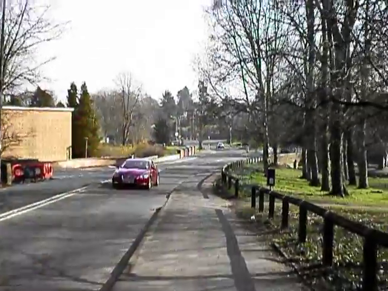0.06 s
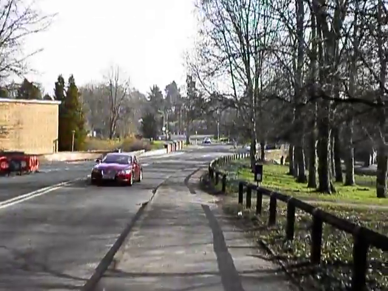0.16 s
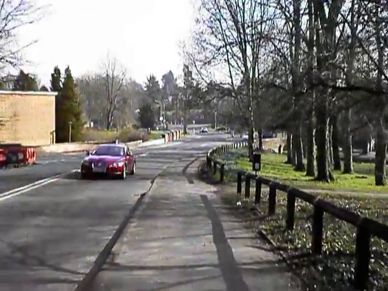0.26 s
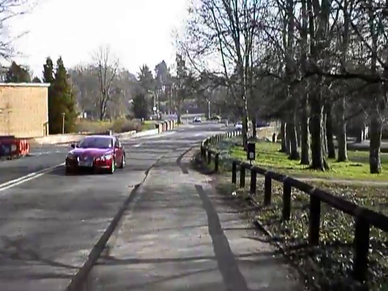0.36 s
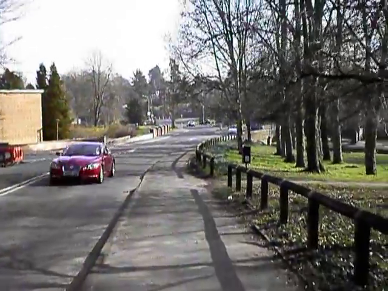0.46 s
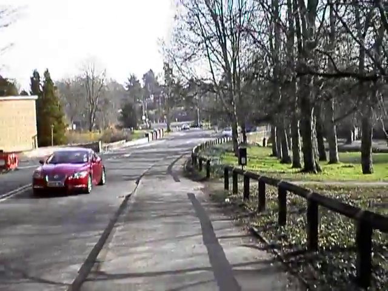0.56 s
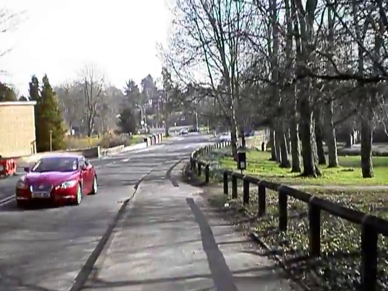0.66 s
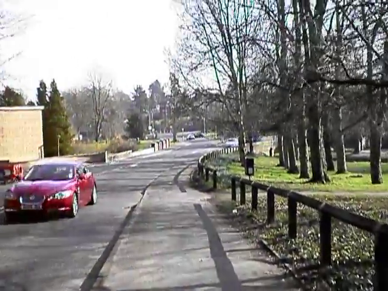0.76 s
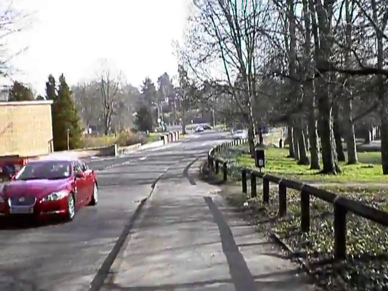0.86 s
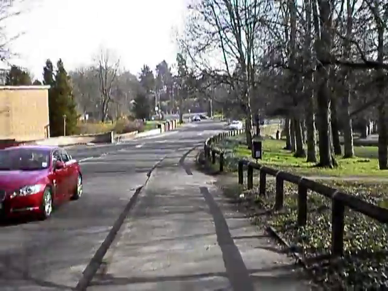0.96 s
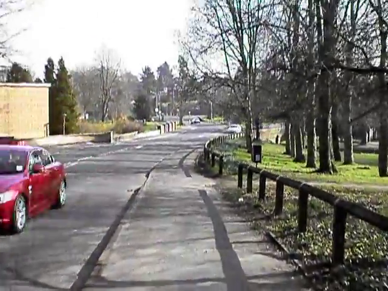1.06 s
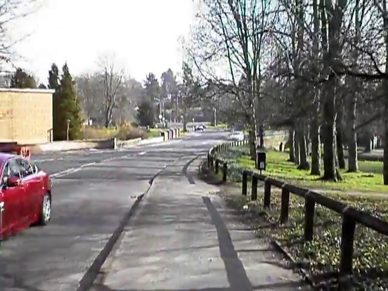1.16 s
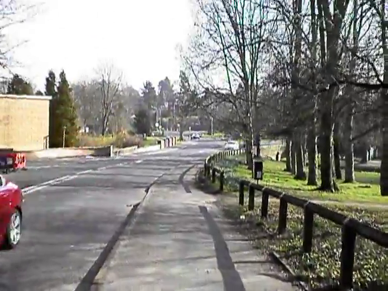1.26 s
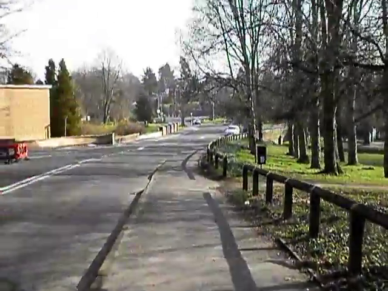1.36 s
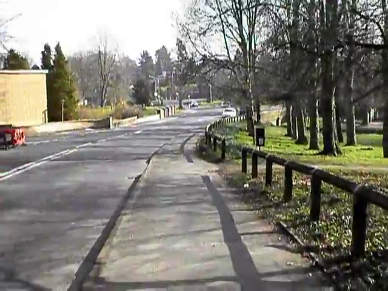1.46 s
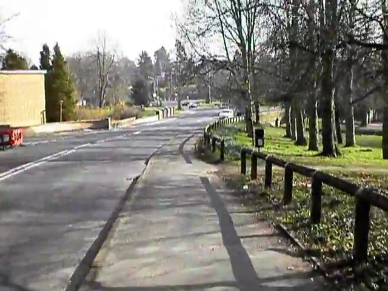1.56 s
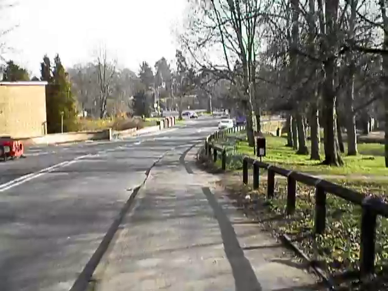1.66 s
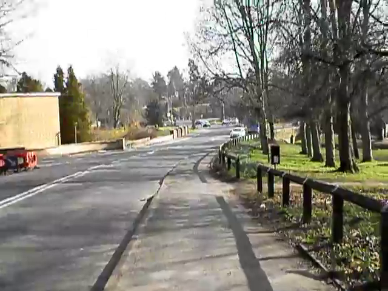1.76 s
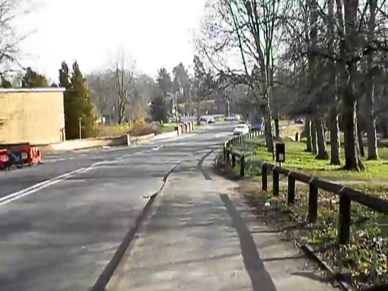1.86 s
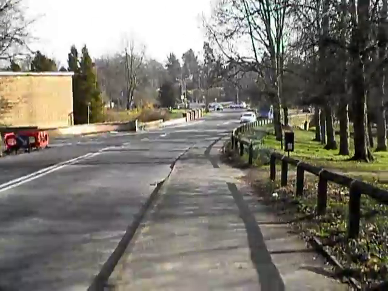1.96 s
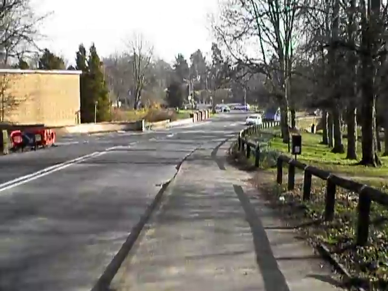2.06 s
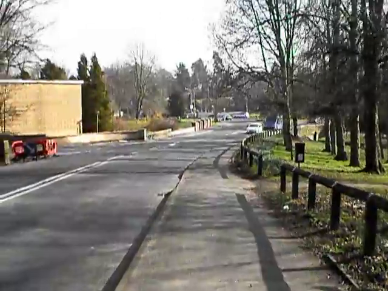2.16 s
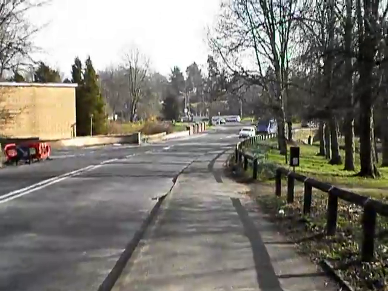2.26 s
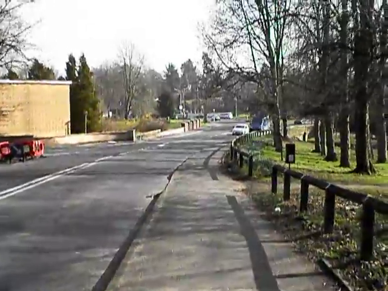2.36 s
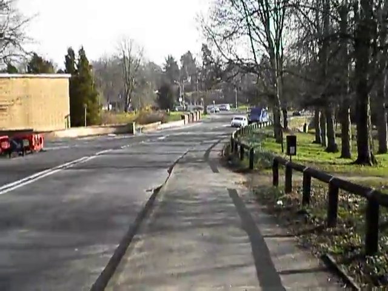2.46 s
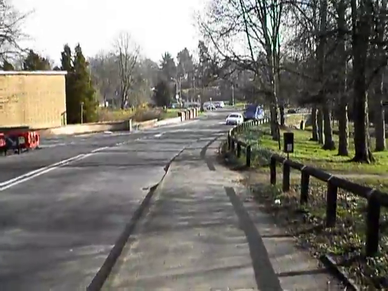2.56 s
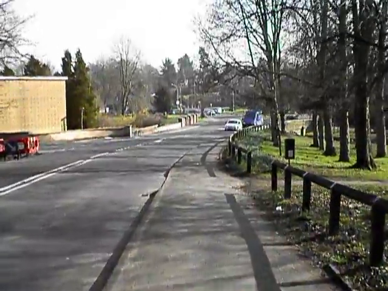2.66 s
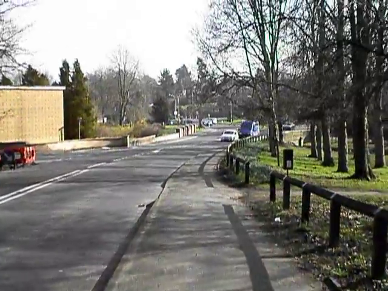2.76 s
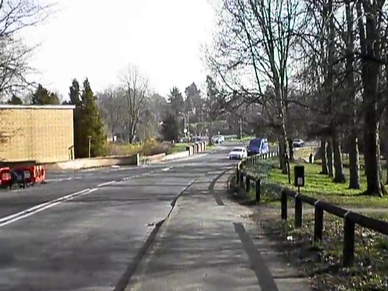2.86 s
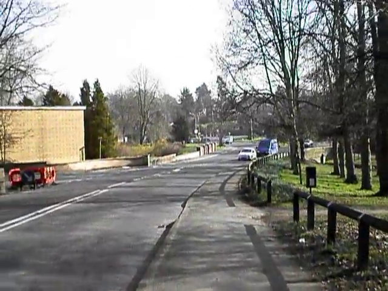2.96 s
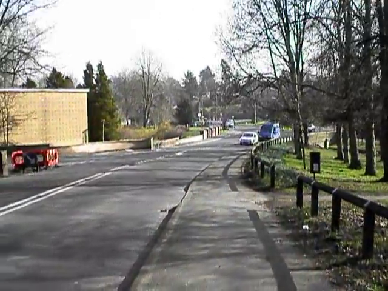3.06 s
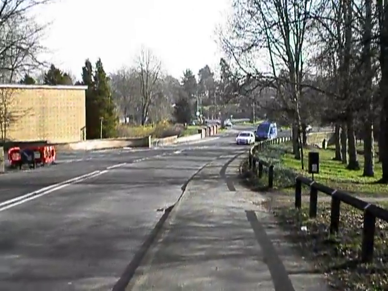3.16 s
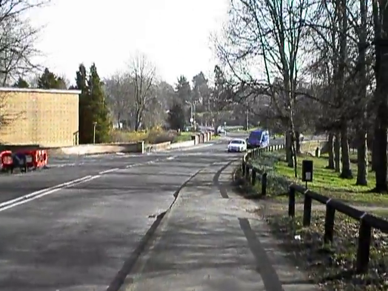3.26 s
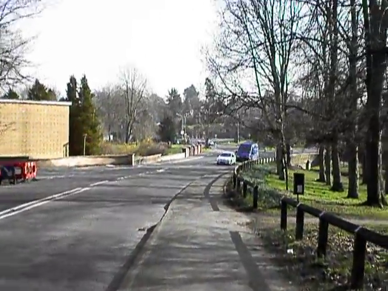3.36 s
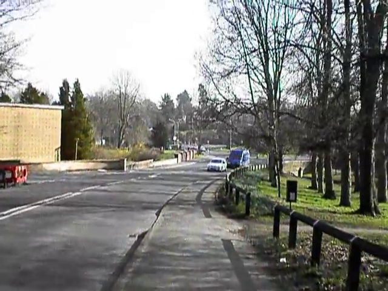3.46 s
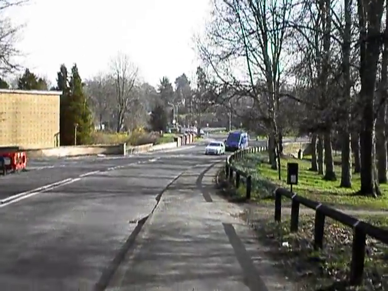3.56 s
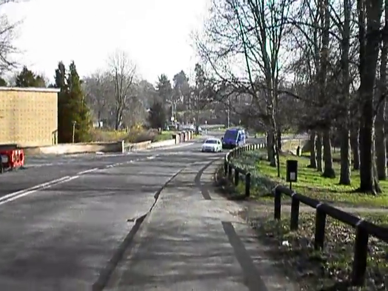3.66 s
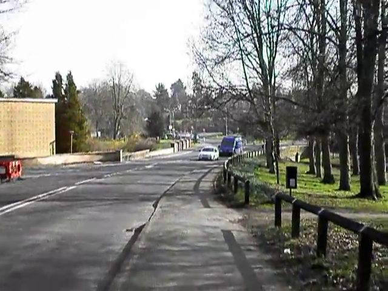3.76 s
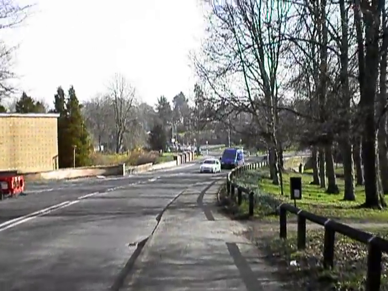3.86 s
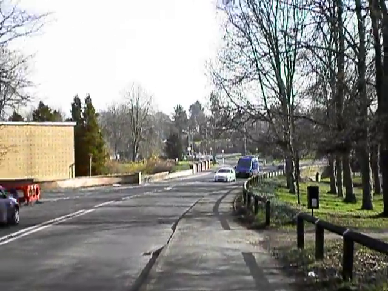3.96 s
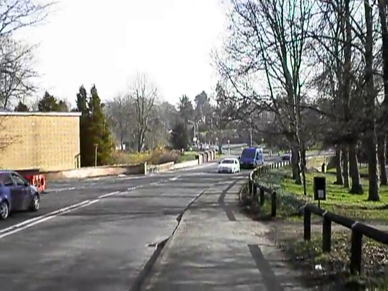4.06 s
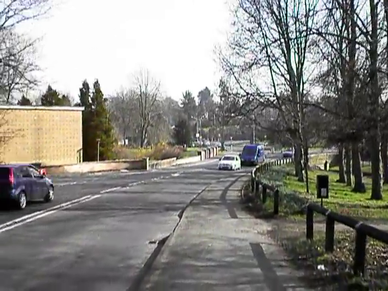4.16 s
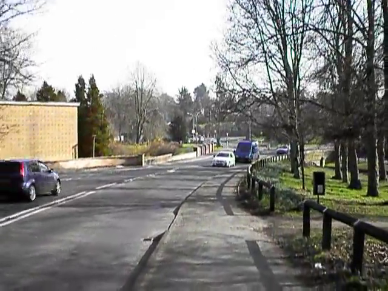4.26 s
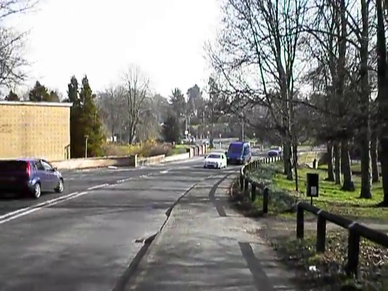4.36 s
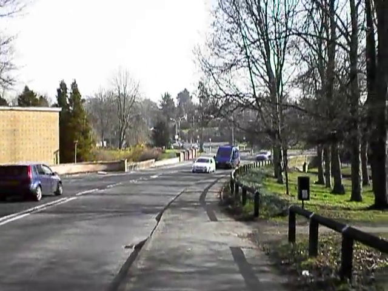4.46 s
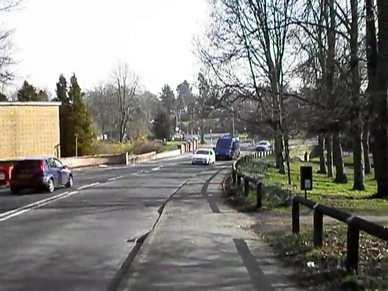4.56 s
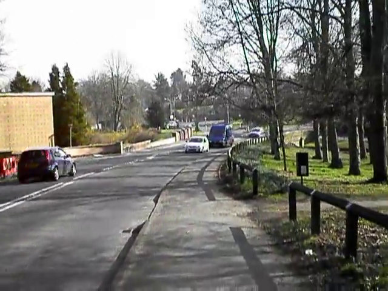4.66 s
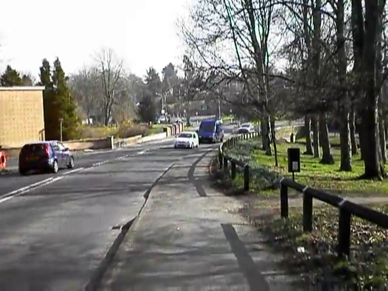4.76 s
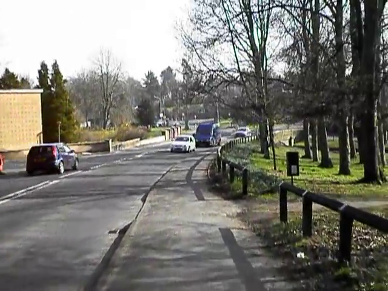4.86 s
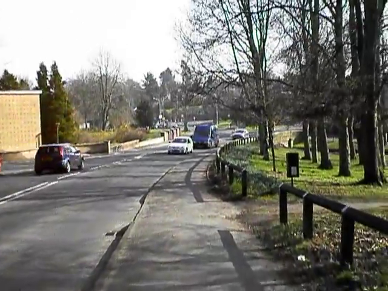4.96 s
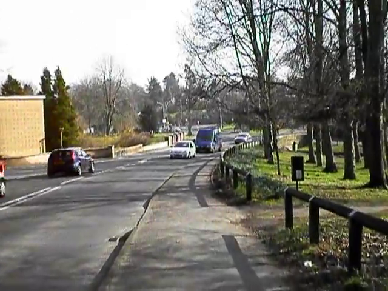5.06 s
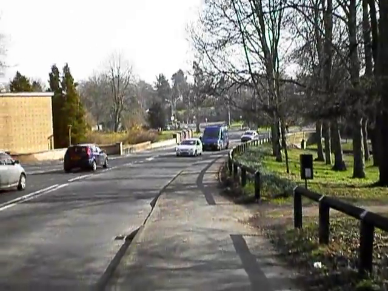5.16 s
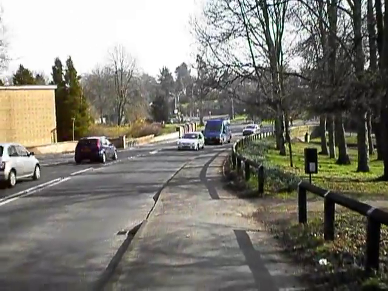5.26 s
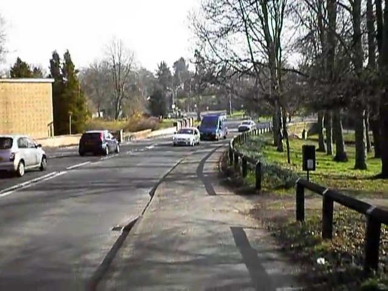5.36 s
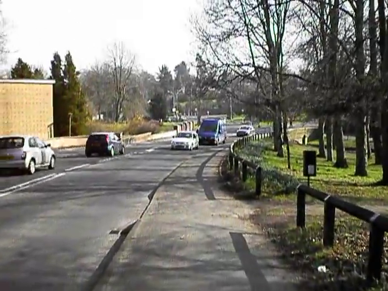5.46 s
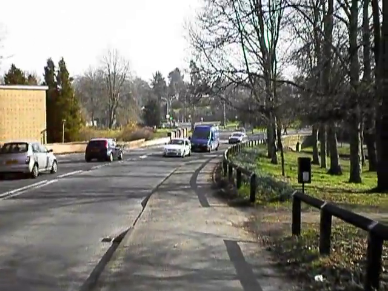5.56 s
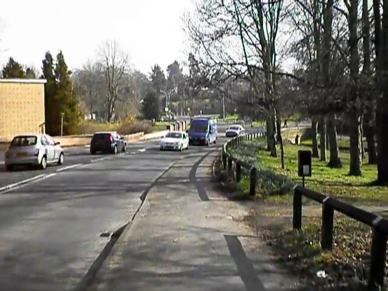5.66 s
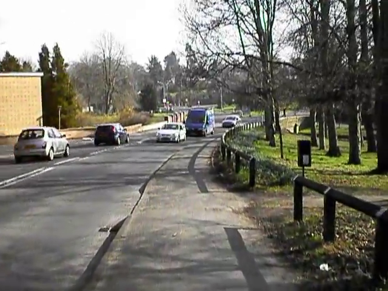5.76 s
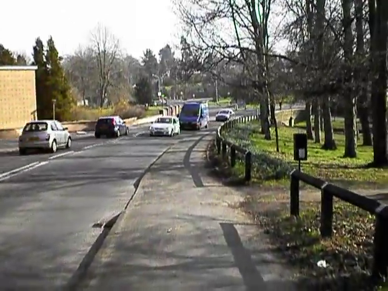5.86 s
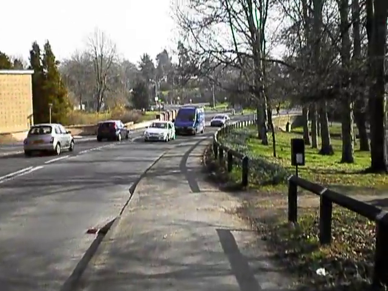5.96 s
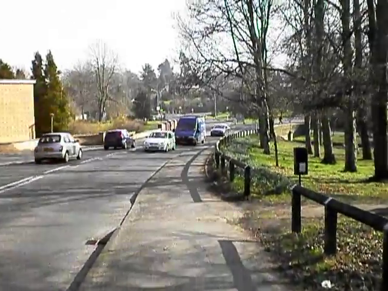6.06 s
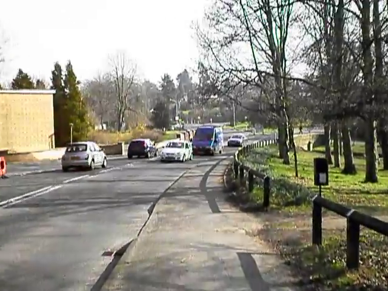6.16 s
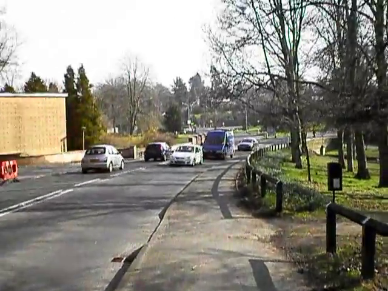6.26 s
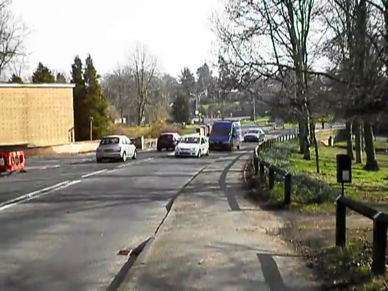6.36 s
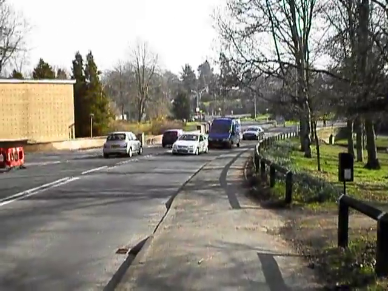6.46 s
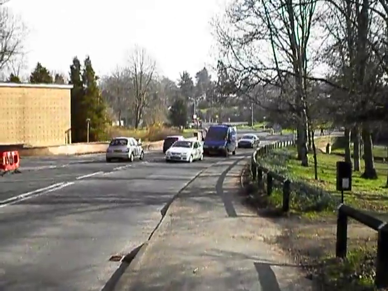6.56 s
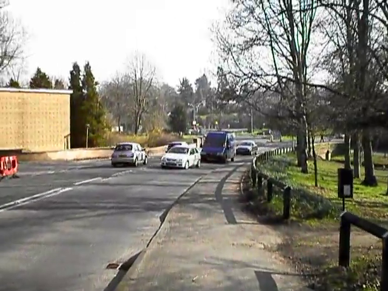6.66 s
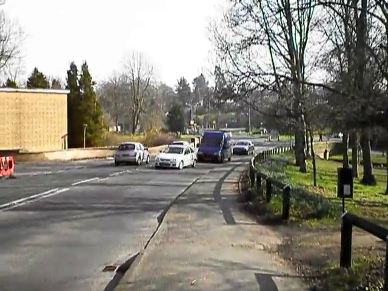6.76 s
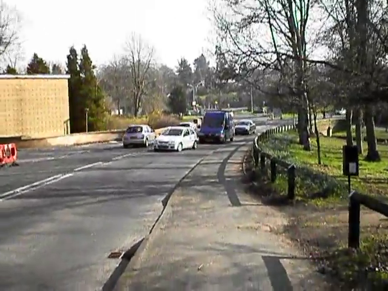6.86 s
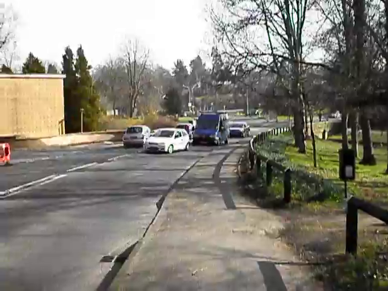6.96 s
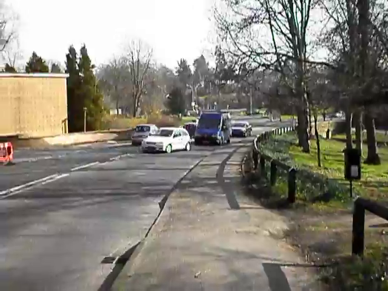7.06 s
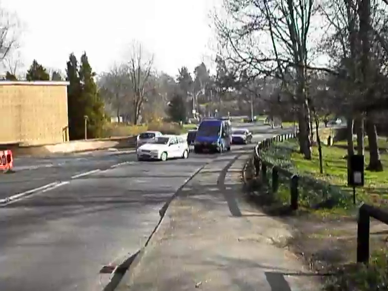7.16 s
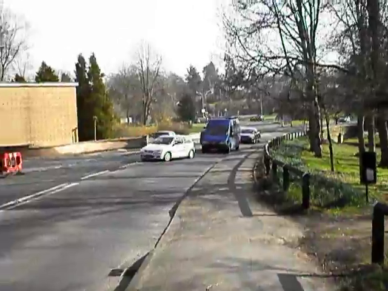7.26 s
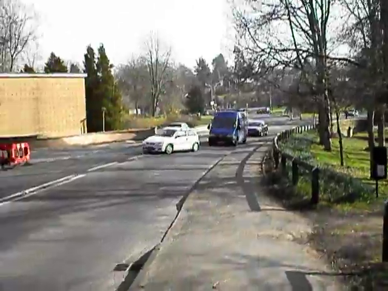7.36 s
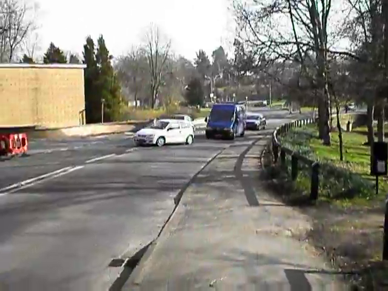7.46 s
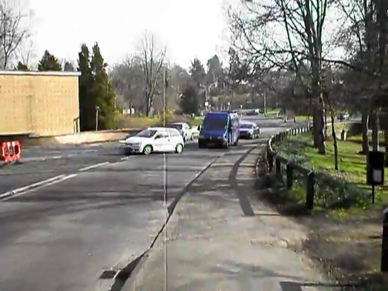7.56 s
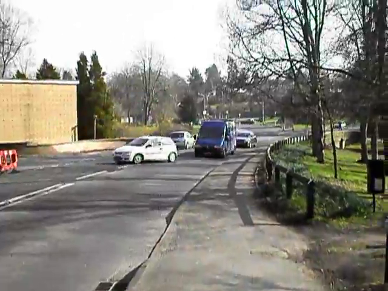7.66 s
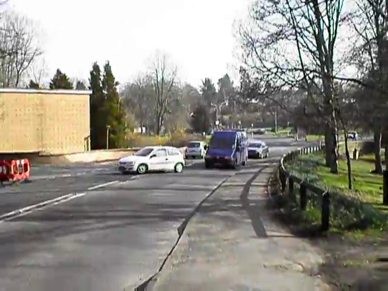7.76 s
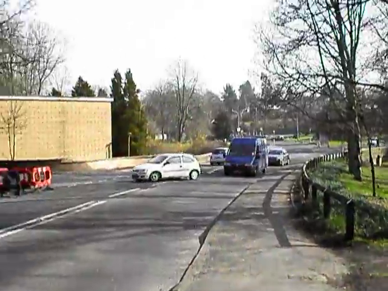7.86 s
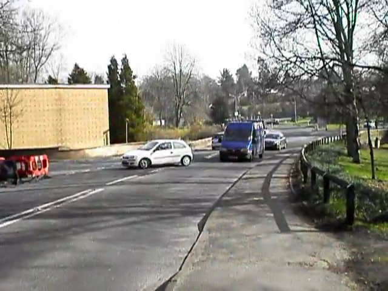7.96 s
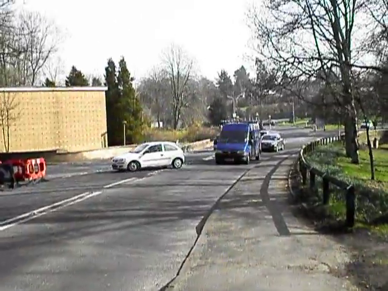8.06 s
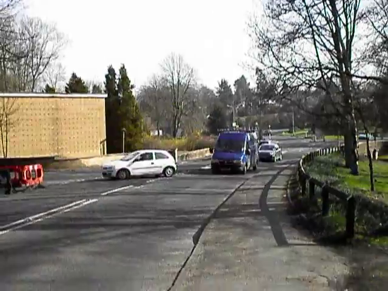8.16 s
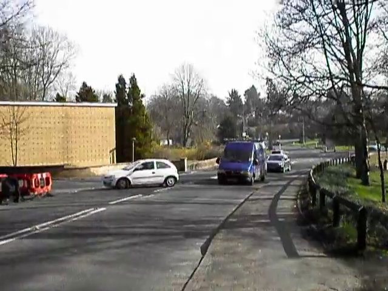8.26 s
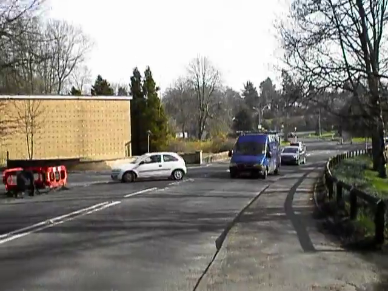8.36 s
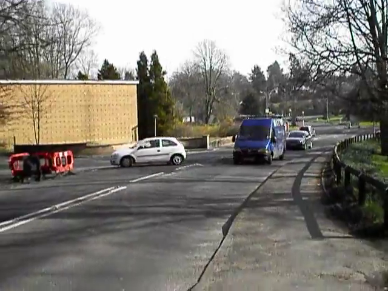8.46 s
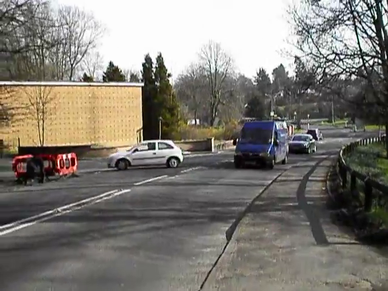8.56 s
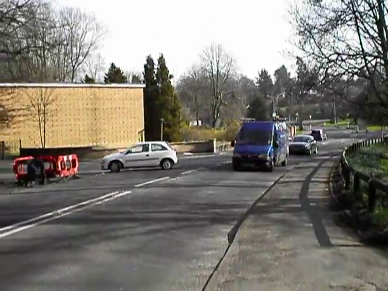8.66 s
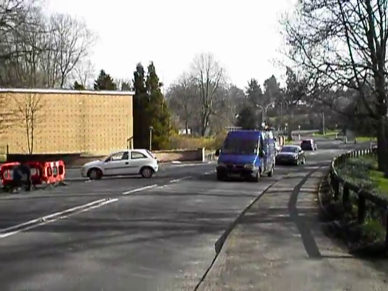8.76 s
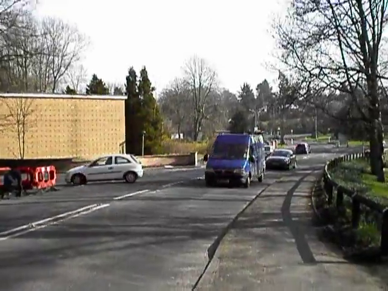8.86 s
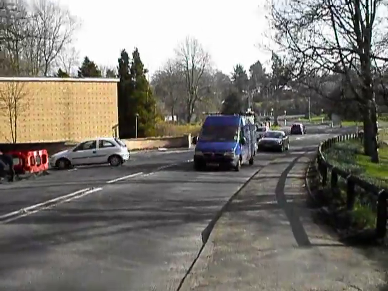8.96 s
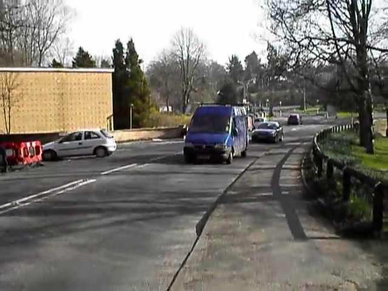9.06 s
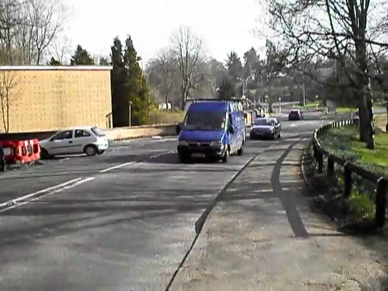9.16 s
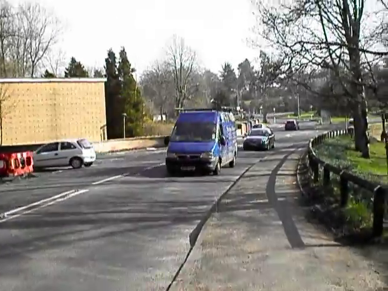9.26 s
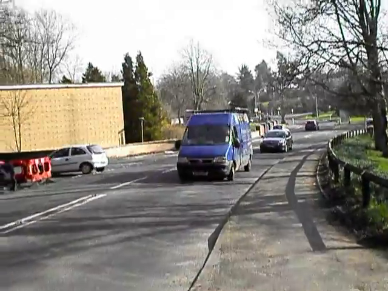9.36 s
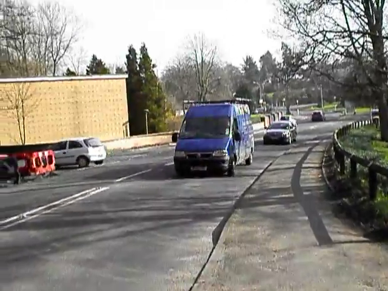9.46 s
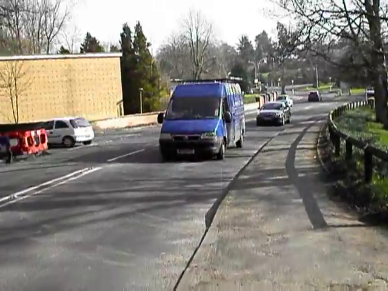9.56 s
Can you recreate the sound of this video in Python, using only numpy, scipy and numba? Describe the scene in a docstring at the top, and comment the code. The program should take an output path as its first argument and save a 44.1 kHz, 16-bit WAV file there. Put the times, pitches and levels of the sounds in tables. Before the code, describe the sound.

Tyre roar rises and fades as cars go by on a road, with gusts of wind thumping on the microphone.

```python
"""Cars pass one after another, a few metres from a small camera held on the pavement; a van comes up last.
Their tyres rumble, roar and hiss, louder on coarse asphalt, with hums that sink in pitch at each pass.
Engines drone underneath, wheels knock on flaws in the road and flick up grit.
Wind buffets the microphone, and the strongest puffs make the camera's limiter duck the traffic."""
import sys
import numpy as np
from scipy import signal
from scipy.fft import rfft, irfft, next_fast_len
from scipy.io import wavfile
from scipy.ndimage import map_coordinates
from numba import njit

SR = 44100
rng = np.random.default_rng(int(sys.argv[2]) if len(sys.argv) > 2 else 0)


def generate_wav(sig):
    """Save sig (samples, or channels by samples) to the path in sys.argv[1] as 16-bit PCM at SR."""
    pcm = np.round(np.clip(np.atleast_2d(sig).T, -1, 1) * 32767).astype(np.int16)
    wavfile.write(sys.argv[1], SR, pcm)


N = 423801
T = np.arange(N) / SR

# vehicles passing the microphone: nearest t/s, time to half power/s, rumble/dB, roar/dB, hiss/dB
PASSES = [(1.85, 0.63, -28, -24, -40.5), (3.85, 0.53, -31.5, -25.5, -40), (4.98, 0.75, -31.5, -29, -41.5),
          (7.8, 0.65, -30.5, -25, -43), (9.47, 0.71, -28, -23, -36.5)]
# spells on coarse asphalt: from t/s, to t/s, extra tyre noise/dB
COARSE_ASPHALT = [(0.65, 2.515, 4), (2.661, 5.557, 3.5)]
# tyre spectra from the pavement: f/Hz, relative level/dB
CASING_SPECTRUM = [(65, -43.5), (110, -10), (124, -10.5), (156, -4), (189, -3.5), (237, 2), (381, -5.5),
                   (520, -13), (680, -40.5), (1140, -120)]
CLOSE_TREAD_SPECTRUM = [(240, -35.5), (400, -7.5), (606, -0.5), (694, -3), (814, -2), (882, -4), (1370, -5),
                        (1620, -9), (1810, -9.5), (2600, -20.5), (3600, -27.5), (4500, -50.5)]  # the first, close car
STREAM_TREAD_SPECTRUM = [(240, -32), (400, -3.5), (834, -1.5), (1120, -1), (1480, -5), (1910, -6),
                         (2380, -14), (2700, -18), (3510, -46.5), (5940, -120)]  # the traffic behind it
GROOVE_AIR_SPECTRUM = [(1900, -9.5), (2400, -0.5), (3000, 1.5), (4000, -5), (5000, -7), (6300, -11),
                       (7500, -26)]
SIZZLE_SPECTRUM = [(3000, 0.5), (4200, -1), (5500, 4.5), (7500, -10)]
# fine sizzle as a wheel comes near: loudest t/s, half-length/s, level/dB
WHEEL_SIZZLES = [(.16, 0.19, -42.5), (0.733, 0.13, -41.5), (1.222, 0.065, -35.5), (1.516, 0.56, -43),
                 (4.5, 0.4, -46.5), (5.7, 0.38, -51), (8.1, 0.32, -45), (9.15, 0.48, -45.5),
                 (9.6, 0.069, -45)]
# broad tread howls: loudest t/s, half-length/s, f/Hz, level/dB, width/Hz
TREAD_HOWLS = [(1.45, .4, 658.4, -30, 271), (1.64, 0.12, 801, -29.5, 379.6), (2.1, 0.18, 840, -22.5, 199.4),
               (2.39, 0.12, 780, -25.5, 189.5), (2.75, 0.28, 773, -29, 270.4),
               (3.2, 0.62, 380.7, -29, 270.4), (3.35, .84, 981.5, -29, 270.2),
               (4.7, 0.88, 1141, -32.5, 190.5), (5.418, 0.13, 644, -30.5, 220.4),
               (6.1, 0.85, 605, -36.5, 269.7), (6.4, .6, 1141, -36.5, 200.1), (7.3, .28, 1084, -36, 262.3),
               (8.05, 0.048, 922, -28, 300), (8.063, 0.027, 1190, -28, 403), (8.97, 0.13, 980, -32, 267),
               (9.399, 0.47, 468, -33, 269.6), (9.55, .1, 3280, -39, 694)]
# narrow tread hums: loudest t/s, half-length/s, f/Hz, relative level/dB,
# Doppler fall either side of f/fraction, width/Hz
TREAD_HUMS = [(1.97, .08, 300, -27, .012, 41), (2.27, .11, 220, -30, 0.0091, 20),
              (2.332, .07, 290, -29, 0.014, 25), (3.447, 0.17, 358, -32.5, .015, 58),
              (3.845, .32, 311, -29, 0.022, 22), (4.548, 0.27, 251.4, -26, 0.02, 24),
              (4.905, 0.16, 240.4, -33, .01, 40), (5.203, 0.39, 205, -35.5, 0.013, 14.6),
              (5.47, 0.097, 241.5, -27, .01, 41.4), (7.1, .5, 289.7, -38.5, .01, 60)]
# engines passing, pulling away or coming near: loudest t/s, half-length/s, strongest order f/Hz,
# level/dB, glide either side of f/fraction
ENGINE_DRONES = [(2.401, .3, 169, -30.5, -.055), (3.68, 0.31, 243, -33.5, -0.043),
                 (4.119, 0.29, 236, -30, -.015), (3.5, 0.32, 158, -38.5, -0.015),
                 (4.84, 0.32, 155, -37.5, -0.012), (6.15, 0.56, 154, -39, 0.011),
                 (9.199, 0.45, 150, -35.5, .06)]
# engine orders: multiple of f, relative level/dB
DRONE_ORDERS = [(.5, -19.5), (1, -3.5), (1.5, -14.5), (2, -9)]
# wheels meeting flaws in the road: t/s, level/dB, slap f/Hz
ROAD_KNOCKS = [(2.1328, -9.5, 627), (2.32, -8.5, 715)]
# stones flicked by the tyres: t/s, relative level/dB, f/Hz, decay/s
GRIT_TICKS = [(.13, -27, 5600, .003), (.152, -19, 5600, .003), (.397, -28, 6100, .006),
              (.461, -24, 5200, 0.0045), (1.646, -23, 4970, .003), (5.499, -25, 6140, .003),
              (5.515, -29, 4350, .015), (8.44, -23, 6200, 0.003)]
# wind strength at the microphone: t/s, relative level/dB
WIND_STRENGTH = [(0.0, -34), (0.14, -42), (0.18, -41), (0.28, -40), (0.38, -28), (0.5, -41.5), (2.1, -41.5),
                 (3.32, -41.5), (3.4, -43), (5.1, -42), (6.18, -36.5), (6.22, -45), (6.66, -34.5),
                 (6.85, -38), (7.41, -40.5), (7.49, -31.5), (7.73, -38), (7.79, -30), (7.93, -43.5),
                 (8.13, -41), (8.17, -35), (8.27, -28), (8.67, -37), (9.61, -44.5)]
# eddies on the microphone: f/Hz, relative level/dB
EDDY_SPECTRUM = [(20, 0.5), (50, -8), (90, -4.5), (130, -8.5), (200, -8.5), (400, -17), (650, -30.5)]
# puffs on the microphone: t/s, thump level/dB, thump f/Hz, push level/dB, thump half-length/cycles
WIND_PUFFS = [(.121, -21, 139, -7, .6), (.137, -18.5, 150, -17, .8), (.148, -18, 170, -6.5, 0.67),
              (0.1547, -6, 170, -8, 0.76), (0.26, -17, 165, -4.5, .65), (0.284, -25, 250, -16, 2.2),
              (.322, -10.5, 136, -2, .5), (.335, -11, 150, -15, 0.54), (.358, -19.5, 245, -15, 2.2),
              (0.39, -22, 200, -6, 1.6), (.423, -20, 150, -5.5, 0.74), (.433, -21, 275, -13, 2.5),
              (.697, -18, 200, -28, 0.72), (5.56, -22, 110, -6, 1.3), (6.14, -17, 121, -17, .48),
              (7.11, -20.5, 123, -17, 0.52), (7.494, -18.5, 160, -2.5, 0.5), (7.58, -25, 109, -4.5, .8),
              (7.785, -18, 133, -2, 1.2), (7.874, -17.5, 160, -6, 0.81), (8.164, -16, 115, -8, .8),
              (8.182, -16, 120, -.5, .8), (8.2245, -3.5, 146, -2.5, 0.55), (8.233, -2, 110, 3, .4),
              (8.363, -9.5, 135, 2, .5), (8.383, -18, 140, -16, 0.74), (8.3995, -10, 165, -9, 0.58),
              (8.442, -5, 190, 6.5, 0.29), (8.45, -11, 170, -13, 0.36), (8.515, -10, 150, -11, .8),
              (8.533, -9.5, 120, -4, 0.54), (8.799, -21, 170, -7, 1.5), (9.185, -16, 110, -3, .5)]


def tyres(coarse_on_s=0.2, coarse_off_s=0.06, handover_s=2.79, patchy_db=0.43, grain_db=0.9):
    """Casings rumble, tread blocks roar and air hisses from the grooves, all jolted by uneven asphalt."""
    coarse_db = sum(db * fade_in(on, coarse_on_s) * (1 - fade_in(off, coarse_off_s))
                    for on, off, db in COARSE_ASPHALT)
    rumble, roar, hiss = passing_gains() * undb(coarse_db)
    stream = fade_in(handover_s, width_s=.48)  # the close car gives way to those behind
    tread = np.sqrt(1 - stream) * noise(CLOSE_TREAD_SPECTRUM)
    tread += np.sqrt(stream) * noise(STREAM_TREAD_SPECTRUM)
    sizzle = np.sqrt(sum(swell(s, half_s, db) ** 2 for s, half_s, db in WHEEL_SIZZLES))
    air = hiss * noise(GROOVE_AIR_SPECTRUM) + sizzle * noise(SIZZLE_SPECTRUM)
    grain = undb(grain_db * walk(350))  # coarse chippings make the hiss gritty
    rolling = rumble * noise(CASING_SPECTRUM) + roar * tread + air * grain
    return rolling * undb(patchy_db * walk(30))


def passing_gains(rumble_lag_s=0.42, hiss_lead_s=0.091):
    """Gains of rumble, roar and hiss at the microphone: the vehicles add in power."""
    power = np.zeros((3, N))
    for s, half_s, rumble_db, roar_db, hiss_db in PASSES:
        power[0] += (undb(rumble_db) * nearness(s + rumble_lag_s, half_s)) ** 2
        power[1] += (undb(roar_db) * nearness(s, half_s)) ** 2
        power[2] += (undb(hiss_db) * nearness(s - hiss_lead_s, half_s)) ** 2
    return np.sqrt(power)


def tread_tones(hums_db=-2):
    """The repeating tread sings in broad howls and in narrow hums that sink as the car goes by."""
    howls = sum(swell(s, half_s, db) * resonance(np.full(N, hz), width_hz)
                for s, half_s, hz, db, width_hz in TREAD_HOWLS)
    hums = sum(swell(s, half_s, db) * resonance(glide(hz, s, half_s, -fall), width_hz)
               for s, half_s, hz, db, fall, width_hz in TREAD_HUMS)
    return howls + undb(hums_db) * hums


def engines(wander=0.01005, rough_db=1.5):
    """Low engine orders, each wavering a little, half buried in the tyre noise."""
    out = np.zeros(N)
    for s, half_s, hz, level_db, rise in ENGINE_DRONES:
        pitch_hz = glide(hz, s, half_s, rise) * (1 + wander * walk(12))
        phase = 2 * np.pi * np.cumsum(pitch_hz) / SR
        orders = sum(undb(db + rough_db * walk(17)) * np.sin(k * phase) for k, db in DRONE_ORDERS)
        out += swell(s, half_s, level_db) * unit(orders)
    return out


def knocks(slap_s=0.002, casing_hz=230, casing_s=0.0063, casing_db=-5):
    """A wheel meets a flaw in the road: the tread slaps and the casing rings briefly."""
    out = np.zeros(N)
    t = T[:SR // 10]
    casing = undb(casing_db) * np.exp(-t / casing_s) * np.sin(2 * np.pi * casing_hz * t)
    for s, db, hz in ROAD_KNOCKS:
        slap = np.exp(-t / slap_s) * np.sin(2 * np.pi * hz * t)
        start = int(s * SR)
        out[start:start + len(t)] += undb(db) * (slap + casing)
    return out


def grit(width_hz=900):
    """Small stones flicked by the tyres tick briefly above the hiss."""
    out = np.zeros(N)
    t = T[:SR // 10]
    for s, db, hz, decay_s in GRIT_TICKS:
        band = signal.iirpeak(hz, hz / width_hz, fs=SR)
        ring = unit(signal.lfilter(*band, rng.standard_normal(len(t))))
        tick = undb(db) * ring * np.exp(-t / decay_s) / 2
        start = int(s * SR)
        out[start:start + len(t)] += signal.lfilter(*band, tick)
    return out


def wind(eddies_db=5.0, gusty_db=1.5, swirl_db=-32, swirl_s=0.026, crest_db=-13,
         push_s=0.012, push_lag_s=0.0089):
    """Eddies rumble right on the microphone; each puff is a thump, a swirl and a push too slow to hear."""
    strength_db = np.interp(T, *np.transpose(WIND_STRENGTH)) + eddies_db
    out = noise(EDDY_SPECTRUM) * undb(strength_db + gusty_db * walk(25))
    turbulence = undb(swirl_db) * noise(EDDY_SPECTRUM)
    for s, thump_db, hz, push_db, cycles in WIND_PUFFS:
        near = np.abs(T - s) < .2
        t = T[near] - s
        phase = 2 * np.pi * hz * t
        wave = np.cos(phase) + undb(crest_db) * np.cos(2 * phase)  # sharp crests, shallow troughs
        thump = undb(thump_db) * np.exp(-(t * hz / cycles) ** 2) * wave
        push = np.exp(-.5 * ((t - push_lag_s) / push_s) ** 2)
        swirl = turbulence[near] * np.exp(-.5 * (t / swirl_s) ** 2)
        out[near] += thump + undb(push_db) * (push + swirl)
    return out


def nearness(s, half_s):
    """Gain of a source on a straight road: one over its distance from the microphone, 1 at time s."""
    return 1 / np.hypot(1, (T - s) / half_s)


def swell(s, half_s, db):
    """Gain that rises to db at time s and dies away again in a bell shape."""
    return undb(db) * np.exp(-.5 * ((T - s) / half_s) ** 2)


def fade_in(s, width_s):
    """Smooth step from 0 to 1 around time s."""
    return .5 + .5 * np.tanh((T - s) / width_s)


def glide(hz, s, half_s, change):
    """Pitch sliding between two steady values around time s, as in the Doppler shift of a pass."""
    return hz * (1 + change * np.tanh((T - s) / half_s))


def resonance(hz, width_hz):
    """A randomly driven resonance of rms 1 whose centre may move."""
    phase = 2 * np.pi * np.cumsum(hz) / SR
    return unit(walk(width_hz) * np.cos(phase) + walk(width_hz) * np.sin(phase))


def noise(spectrum):
    """Noise of rms 1 with an (f/Hz, level/dB) spectrum that falls away steeply past both ends."""
    size = next_fast_len(N)
    octave = np.log2(np.maximum(np.arange(size // 2 + 1) * SR / size, 1))
    hz, db = np.transpose(spectrum)
    octaves_outside = np.maximum(np.log2(hz[0]) - octave, octave - np.log2(hz[-1])).clip(0)
    gain = undb(np.interp(octave, np.log2(hz), db) - 140 * octaves_outside)
    return unit(irfft(rfft(rng.standard_normal(size)) * gain, size)[:N])


def walk(rate):
    """Smooth random drift of rms 1 that changes about rate times a second."""
    knots = rng.standard_normal(4096)
    sparse_t = T[::8]
    drift = map_coordinates(knots, [sparse_t * rate], order=2, mode="wrap")
    return unit(np.interp(T, sparse_t, drift))


def undb(db):
    """Decibels to gain."""
    return 10 ** (np.asarray(db) / 20)


def unit(x):
    """Scale to rms 1."""
    return x / np.sqrt(np.mean(x ** 2))


@njit
def follow_peaks(x, attack, release, level):
    """The limiter's detector: from its starting level, quick to rise and slow to fall."""
    out = np.empty(len(x))
    for i in range(len(x)):
        level += (x[i] - level) * (attack if x[i] > level else release)
        out[i] = level
    return out


def scene():
    """Traffic a few metres off and wind, at one microphone on the pavement."""
    return (tyres() + tread_tones() + engines() + knocks() + grit() + wind())[None]


def record(dry, ceiling_db=-5, attack_s=0.0017, release_s=0.13, start_db=1.5,
           low_cut_hz=42, notch_hz=5365, notch_width_hz=900, top_hz=7400):
    """The camera's limiter, already ducking at the start, takes the full wind pressure; filters follow."""
    peak = follow_peaks(np.abs(dry[0]), 1 / (attack_s * SR), 1 / (release_s * SR), float(undb(start_db)))
    gain = (1 + (peak / undb(ceiling_db)) ** 5) ** (-1 / 5)  # soft knee
    low_cut = signal.butter(3, low_cut_hz, "highpass", fs=SR, output="sos")
    notch = signal.iirnotch(notch_hz, notch_hz / notch_width_hz, fs=SR)
    high_cut = signal.cheby1(12, .1, top_hz, fs=SR, output="sos")
    x = signal.sosfiltfilt(low_cut, dry * gain)  # run both ways, so thumps stay compact
    x = signal.lfilter(*notch, x)
    return signal.sosfilt(high_cut, x)


dry = scene()
out = record(dry)
generate_wav(out)
```